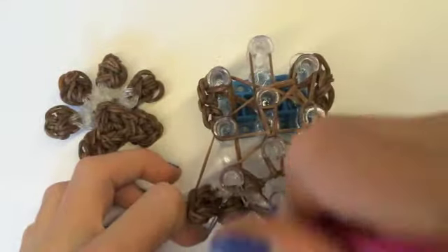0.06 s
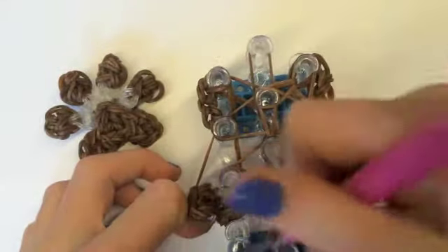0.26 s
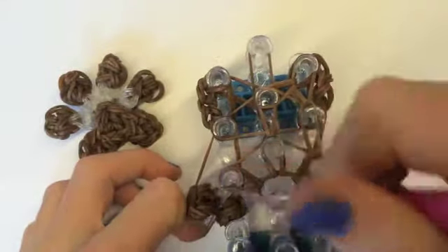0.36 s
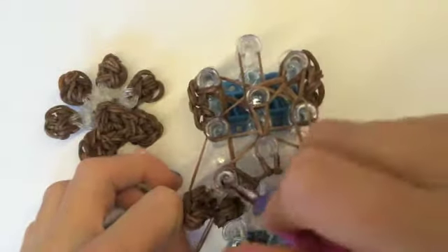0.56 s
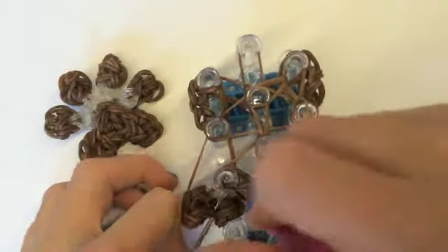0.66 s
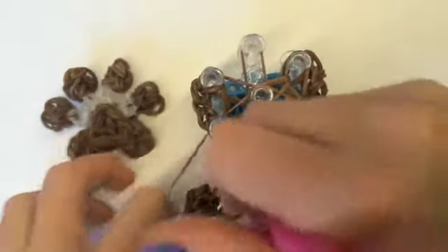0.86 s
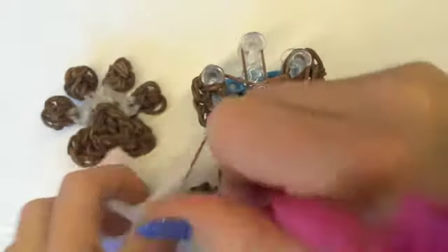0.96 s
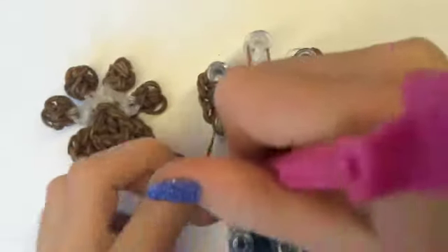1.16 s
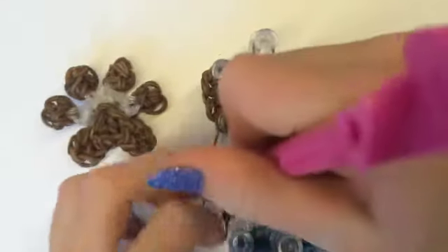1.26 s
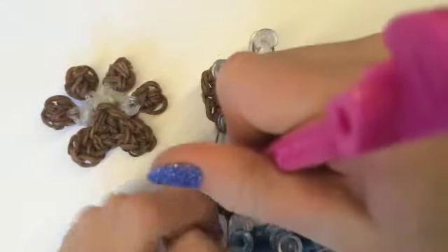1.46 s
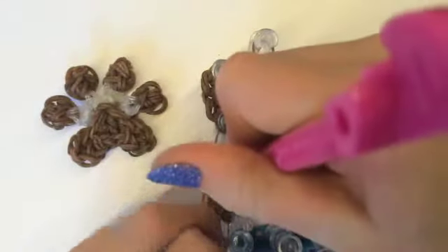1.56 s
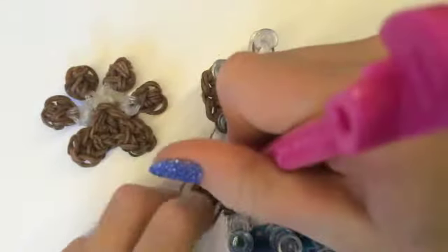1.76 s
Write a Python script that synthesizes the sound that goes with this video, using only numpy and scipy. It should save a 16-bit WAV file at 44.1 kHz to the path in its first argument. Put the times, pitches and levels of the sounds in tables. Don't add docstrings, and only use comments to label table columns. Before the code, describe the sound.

A plastic hook snaps sharply off a tight band onto hollow plastic pegs and bounces, then faint ticks, dull table knocks, rubber and skin rubs and one brief creak, close to the microphone in a quiet room.

```python
import sys
import numpy as np
from scipy import signal
from scipy.fft import rfft, irfft
from scipy.io import wavfile
from scipy.ndimage import uniform_filter1d

SR = 44100
rng = np.random.default_rng(int(sys.argv[2]) if len(sys.argv) > 2 else 0)


def gain_from_db(level_db):
    decades = np.asarray(level_db, float) / 20
    return 10 ** decades


def wrap_up_sound(samples):
    columns = np.atleast_2d(samples).T
    tamed = np.clip(columns, -1, 1)
    steps = np.round(tamed * 32767).astype(np.int16)
    wavfile.write(sys.argv[1], SR, steps)


N = 81585

# pitch_hz [Hz], level_db [dB]
PEG_TONES = [(1200, -0.5), (1390, -1.5), (1950, -8.5), (2590, 4), (3130, -4), (3520, -5), (4700, -6.5),
             (5580, 1), (5960, 2.5), (8300, -4), (9300, -1), (11800, -2), (12800, -0.5), (14850, -1.5)]


def evened(x):
    return x / np.sqrt(np.mean(x ** 2) + 1e-20)


def read(points, hz):
    f, value = np.transpose(points)
    return np.interp(np.log(hz + 1), np.log(f + 1), value)


def add(mix, start_s, sound):
    part = mix[round(start_s * SR):][:len(sound)]
    part += sound[:len(part)]


def follow(curve):
    s, db = np.transpose(curve)
    return gain_from_db(np.interp(np.arange(N) / SR, s, db, left=-150, right=-150))


def colour(x, db_of):
    gain = gain_from_db(db_of(np.fft.rfftfreq(len(x), 1 / SR)))
    return irfft(rfft(x) * gain, len(x))


def resonate(x, hz, width_hz):
    turn = np.exp(2j * np.pi * np.cumsum(hz * np.ones(len(x))) / SR)
    r = np.exp(-np.pi * width_hz / SR)
    smooth = signal.lfilter([1 - r], [1, -r], x / turn)
    return 2 * (turn * smooth).real


def ring(modes, top_hz, spread, detune, size):
    t = np.arange(size) / SR
    total = np.zeros(size)
    for (hz, db, t60_s), shift in zip(modes, detune):
        blow_db = -4.3 * (np.log2(hz / top_hz) / spread) ** 2
        fade = gain_from_db(db + blow_db - 60 * t / t60_s)
        total += fade * np.sin(2 * np.pi * hz * (1 + shift) * t)
    return total


def clicks(rows, body):
    size = 1024
    near, spread_out = np.zeros((2, N))
    t = np.arange(size) / SR
    modes = [(hz, db, .018 * (2500 / hz) ** .35) for hz, db in body]
    for start_s, db, top_hz, spread, contact_s in rows:
        def tone(f):
            return -6 * (np.log2((f + 20) / top_hz) / spread) ** 2

        rise = np.minimum(2 * t / contact_s, 1)
        detune = .008 * rng.standard_normal(len(body))
        rung = rise * ring(modes, top_hz, spread, detune, size + 8)[8:]
        crack = rise * colour(rng.standard_normal(size), tone) * np.exp(-3 * t / (4 * contact_s))
        click = rung / abs(rung).max() + gain_from_db(-3) * crack / abs(crack).max()
        click *= gain_from_db(db) / abs(click).max()
        spike = np.zeros(size)
        spike[64] = 1
        flash = colour(spike, tone)
        flash *= np.linalg.norm(click) / np.linalg.norm(flash)
        add(near, start_s, click)
        add(spread_out, start_s, flash + 0.15 * click)
    return np.array([near, spread_out])


def snaps():
    snap_rows = [
        (.2277, -4.5, 7000, 1.6, .0009),
        (.2333, -9, 11500, 1.0, .0014),
        (.2342, -16, 2600, 1.3, .0016),
        (.2405, -26, 1100, 1.0, .004),
        (.2488, -29, 7000, 1.8, .002),
        (.2535, -33, 6000, .4, .001),
    ]
    return clicks(snap_rows, PEG_TONES)


def rebounds():
    rebound_rows = [
        (.2807, -20, 9500, 1.0, .0009),
        (.2811, -22, 4500, 1.0, .0013),
        (.2855, -36, 1000, .55, .004),
        (.5492, -42, 3300, .5, .0015),
        (.352, -49, 1230, .2, .004),
        (.551, -50, 900, .3, .003),
        (.8112, -40, 1150, .35, .002),
        (1.781, -60, 800, .2, .005),
        (1.6715, -59, 3600, .2, .0012),
        (1.7432, -56, 1870, .15, .0025),
    ]
    shaft_tones = [(1050, -5), (1200, -6.5), (1900, -6), (2700, 2.5), (3130, 4), (3520, -12), (4250, -0.5),
                   (4710, -0.5), (5100, 4), (6180, -18), (8670, 4.5), (9740, 3.5), (10870, 2), (12730, -9)]
    return clicks(rebound_rows, shaft_tones)


def ticks():
    tick_rows = [(.2044, -54.5, 6010, 0.9), (0.211, -54.5, 8260, 2.5), (0.217, -53.5, 6450, 1.57),
                 (0.2198, -76, 9000, 1.6), (0.569, -41, 4820, 0.9), (0.7894, -48.5, 8983, 0.81),
                 (0.8815, -46, 8840, 0.33), (0.9591, -49.5, 5880, 2.6), (0.958, -73, 7870, 1.5),
                 (1.0033, -47, 13000, 0.35), (1.023, -53, 12250, 0.28), (1.135, -63.5, 13000, 0.38),
                 (1.172, -51.5, 6950, 1.14), (1.3154, -57.5, 2920, 0.31), (1.475, -64, 3190, 0.65),
                 (1.51, -63, 2620, 0.12), (1.556, -63, 1450, 1.21), (1.652, -56.5, 2580, 0.3),
                 (1.671, -52.5, 2970, 1.17), (1.7427, -58, 1200, 0.68), (1.7589, -47.5, 5074, 3.07),
                 (1.7792, -56, 2600, 0.75), (1.778, -56, 10100, 0.39), (1.5101, -63.5, 9360, 0.53),
                 (1.473, -66, 6500, 0.724), (1.556, -60, 13220, .6), (1.316, -63.5, 8866, 0.634),
                 (1.644, -63, 6000, 1.3), (1.7425, -61, 5431, .4)]
    contact_s = .0012
    return clicks([(*row, contact_s) for row in tick_rows], PEG_TONES)


def table_knocks():
    knock_rows = [(.002, -55.5, 350, 0.25), (0.2336, -33.5, 300, 0.48), (.239, -31, 449, 0.37),
                  (0.253, -47.5, 492, 1.1), (0.285, -37, 324, 0.85), (0.326, -49.5, 260, 0.41),
                  (.551, -41, 288, 0.74), (.5700, -30, 272, 0.54), (.584, -42, 490.4, 0.33),
                  (0.595, -40.5, 270, 0.17), (0.6173, -41.5, 241, 0.42), (.575, -40, 480, 0.31),
                  (0.7914, -45, 458, 0.77), (0.81, -43.5, 504, 0.65), (.826, -47, 436, 0.34),
                  (0.888, -57.5, 283, 0.29), (.957, -52.5, 335.6, 0.53), (0.978, -50.5, 303, 1.8),
                  (1.011, -53.5, 347, 0.49), (1.241, -51.5, 195.4, 0.26), (1.314, -64, 178.3, 0.28),
                  (0.846, -53.5, 111, 0.41), (1.134, -57.5, 119, 0.4), (0.678, -57.5, 108, 0.31),
                  (1.442, -65, 128.9, 0.31), (1.743, -60.5, 203, 1.184)]
    table_tones = [(60.4, -13, 0.12), (104, -1, 0.089), (212.7, -7.5, 0.15), (267.6, -0.5, 0.15),
                   (298.4, -2, 0.15), (372.9, -0.5, 0.074), (471.6, -0.5, 0.072), (499.7, 4, 0.023),
                   (777.8, -10.5, 0.052), (1010, -18.5, 0.046)]
    size, push_s = 16000, .0015
    out = np.zeros(N)
    rise = 1 - np.exp(-np.arange(size) / SR / push_s)
    for start_s, db, top_hz, spread in knock_rows:
        rung = rise * ring(table_tones, top_hz, spread, np.zeros(len(table_tones)), size)
        add(out, start_s, gain_from_db(db) * rung / abs(rung).max())
    return out


def rubs():
    strokes = [
        (0.221, 0.032, -71, 18, 1.3),
        (0.254, 0.17, -63, -5, 1.4),
        (0.54, 0.1, -56.5, -3.5, 0.77),
        (0.649, 0.056, -69, -3.5, 0.67),
        (0.763, 0.18, -61.5, -2.5, 1.04),
        (0.946, 0.047, -57.5, -4.5, 1.07),
        (0.986, 0.057, -58, -2.5, 1.2),
        (1.152, 0.2, -58, -2, 3.74),
        (1.739, 0.078, -64.5, -7.5, 1.1),
    ]
    rub_body = [(500, 0.5), (1500, -2.65), (2600, 1.9), (4000, -4.5), (5800, 1.5), (7000, -0.4),
                (8500, -0.7), (13000, -1.6)]
    grains_per_s, grain_db, patch_db = 2500, 5, 2.5
    size = gain_from_db(grain_db * np.minimum(rng.exponential(1, N), 3))
    grains = rng.standard_normal(N) * size * (rng.random(N) < grains_per_s / SR)
    grit = grains + 0.98 * rng.standard_normal(N)
    hz, _, z = signal.stft(grit, SR, nperseg=256)
    patches = uniform_filter1d(rng.standard_normal(z.shape), size=7, axis=0)
    patches = evened(uniform_filter1d(patches, size=6, axis=1))
    gain = gain_from_db(read(rub_body, hz)[:, None] + patch_db * patches)
    grit = signal.istft(z * gain, SR, nperseg=256)[1]
    out = np.zeros(N)
    for start_s, length_s, db, tilt, peaked in strokes:
        u = np.linspace(0, 1, round(length_s * SR))
        part = grit[round(start_s * SR):][:len(u)]
        part = colour(part, lambda f: tilt * np.log2((f + 300) / 4000))
        swell = abs(np.sin(np.pi * u ** 0.71)) ** peaked
        add(out, start_s, gain_from_db(db) * swell * evened(part))
    return out


def creak():
    pressure = [
        (1.17, -79.5),
        (1.2, -87),
        (1.22, -55),
        (1.232, -52),
        (1.242, -41.5),
        (1.253, -57.5),
        (1.262, -48.5),
        (1.29, -69.5),
        (1.36, -83),
    ]
    creak_tones = [(878, 77, 5, .14), (1050, 100, -0.5, 0.068), (1674, 180, 3.5, -0.0236),
                   (2080, 450, -11, 0.011), (2480, 120, -9, 0.041), (2920, 240, -16, 0.064)]
    stretch_s = (1.21, 1.25)
    slips_per_s, slip_size = 275, 2.7
    strength = 0.23 + slip_size * (rng.random(N) < slips_per_s / SR)
    slips = rng.standard_normal(N) * strength
    slack = np.interp(np.arange(N) / SR, stretch_s, (1, 0))
    body = np.zeros(N)
    for hz, width_hz, db, raised in creak_tones:
        moving_hz = hz * (1 + raised * slack)
        once = resonate(slips, moving_hz, 1.03 * width_hz)
        body += gain_from_db(db) * evened(resonate(once, moving_hz, 0.96 * width_hz))
    return follow(pressure) * evened(body)


def hum():
    hum_level = [(0.0, -67), (0.2, -105), (0.23, -48.5), (0.396, -71.5), (0.52, -71), (0.572, -63),
                 (0.644, -61), (0.994, -84.5), (1.034, -70), (1.128, -64), (1.334, -63.5), (1.374, -74.5),
                 (1.566, -52), (1.596, -71), (1.71, -45), (1.788, -66), (1.828, -50), (1.85, -49)]
    hum_hz, width_hz, trim_db = 130, 45, -6.5
    once = resonate(rng.standard_normal(N), hum_hz, width_hz)
    boom = evened(resonate(once, hum_hz, width_hz))
    return gain_from_db(trim_db) * follow(hum_level) * boom


def air():
    hiss_colour = [(15, -55), (25, -13), (153, -11), (818, -28.5), (911, -24.5), (1290, -30.5), (1520, -31),
                   (12900, -38), (16000, -44)]
    hiss = colour(rng.standard_normal(N), lambda f: read(hiss_colour, f))
    return gain_from_db(-70.5) * evened(hiss)


def room(x):
    echo_fade = [(300, 0.39), (1000, 0.39), (3000, 0.22), (7000, 0.14), (14000, 0.12)]
    level_db, delay_s = -17.5, 0.0039
    echoes = np.zeros(SR // 2)
    at = np.arange(round(delay_s * SR), SR // 2 - 20, 10)
    echoes[at + rng.integers(0, 10, len(at))] = rng.choice([-1., 1.], len(at))
    hz, t, z = signal.stft(echoes, SR, nperseg=256)
    fade = gain_from_db(-60 * t / read(echo_fade, hz)[:, None])
    tail = signal.istft(z * fade, SR, nperseg=256)[1]
    return gain_from_db(level_db) * signal.fftconvolve(x, tail / np.linalg.norm(tail))[:N]


def scene():
    near, spread_out = snaps() + rebounds() + ticks()
    handling = table_knocks() + rubs()
    squeak = creak()
    echo = room(spread_out + handling + 0.37 * squeak)
    return (near + handling + squeak + echo + hum() + air())[None]


def roll_off(x):
    return signal.sosfilt(signal.butter(12, 16470, fs=SR, output="sos"), x)


def record(dry):
    low_cut = signal.butter(2, 45, "high", fs=SR, output="sos")
    x = signal.sosfilt(low_cut, dry)
    x = signal.oaconvolve(x, signal.firwin(127, 15300, fs=SR)[None], "same")
    return roll_off(x)


dry = scene()
out = record(dry)
wrap_up_sound(out)
```